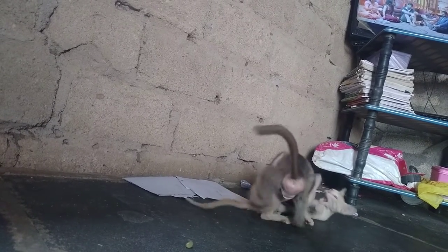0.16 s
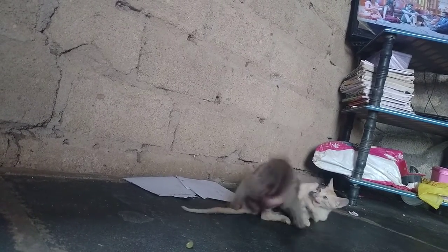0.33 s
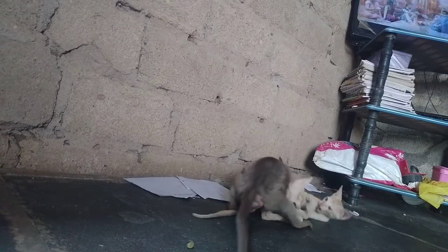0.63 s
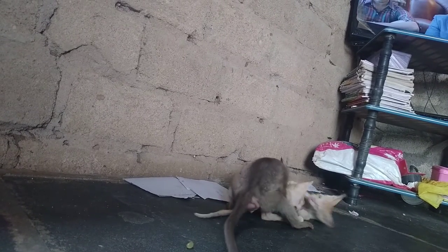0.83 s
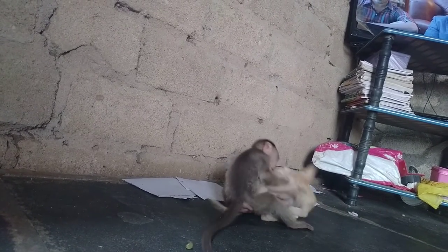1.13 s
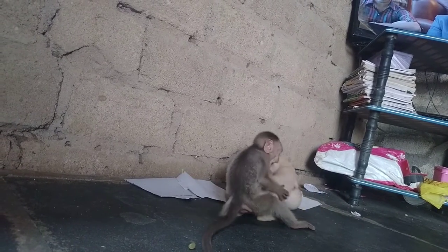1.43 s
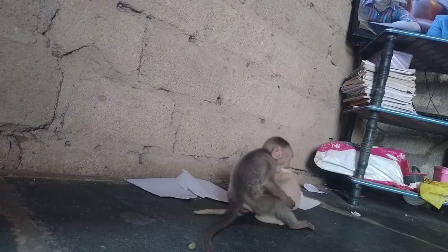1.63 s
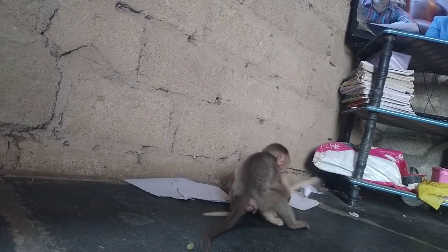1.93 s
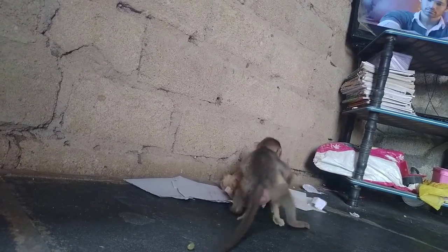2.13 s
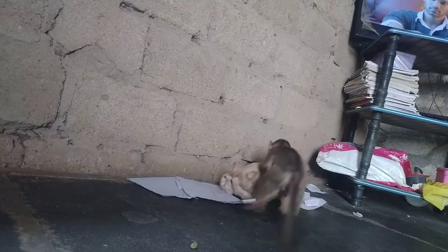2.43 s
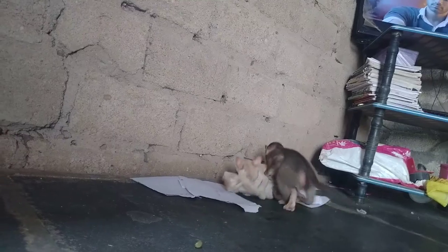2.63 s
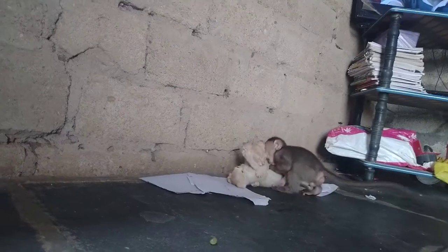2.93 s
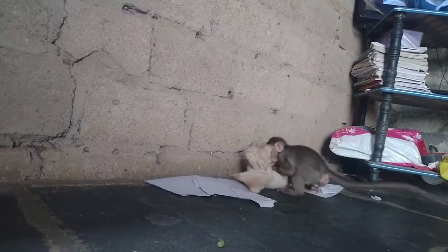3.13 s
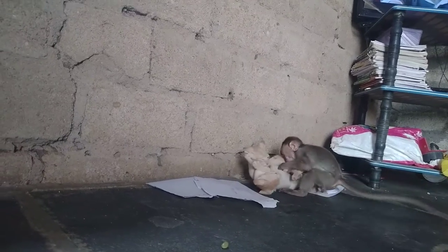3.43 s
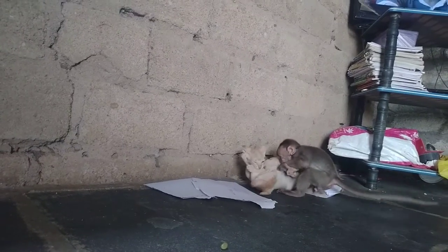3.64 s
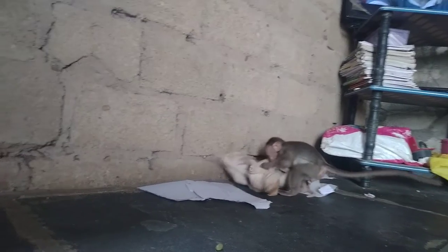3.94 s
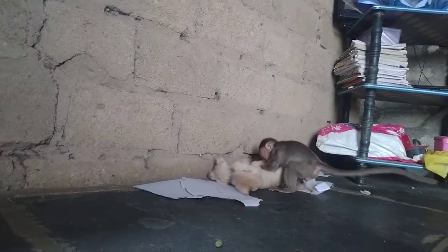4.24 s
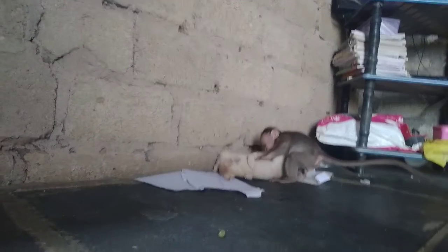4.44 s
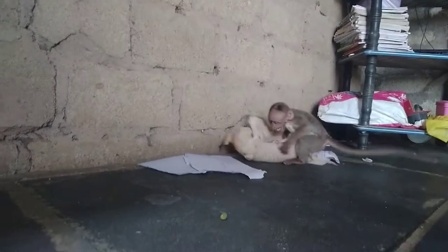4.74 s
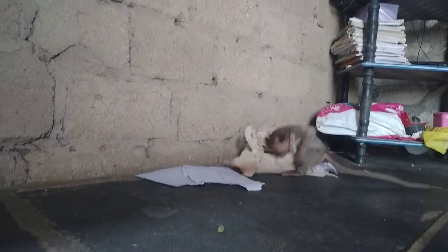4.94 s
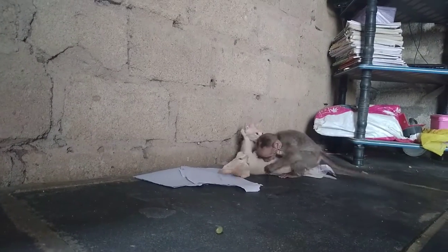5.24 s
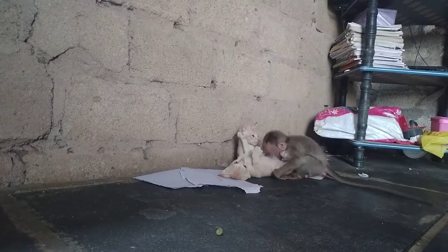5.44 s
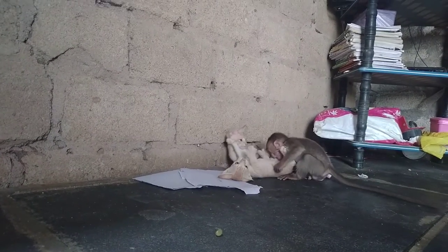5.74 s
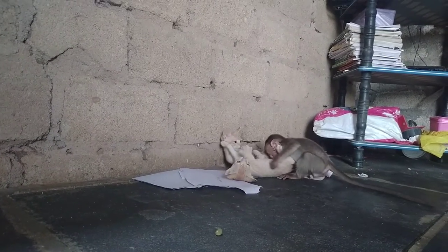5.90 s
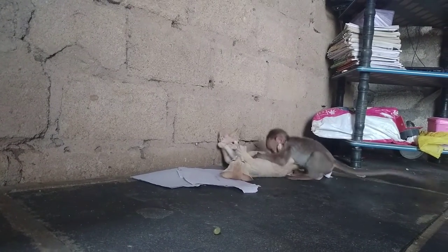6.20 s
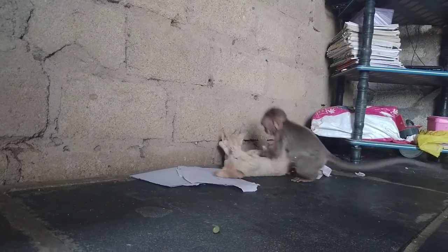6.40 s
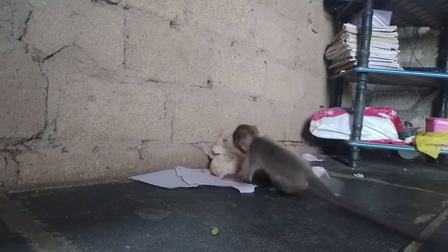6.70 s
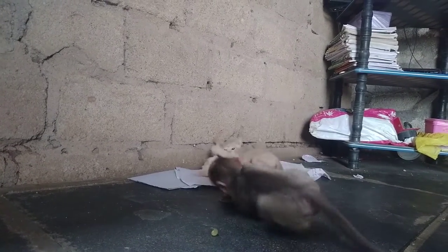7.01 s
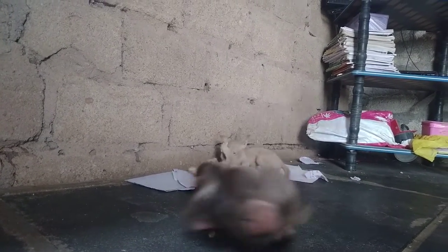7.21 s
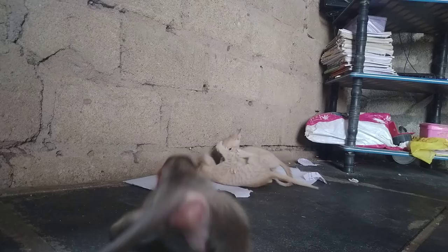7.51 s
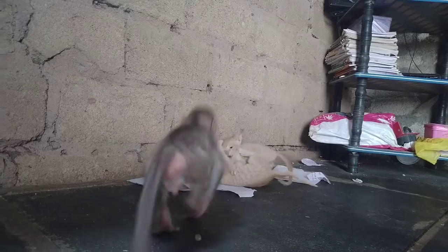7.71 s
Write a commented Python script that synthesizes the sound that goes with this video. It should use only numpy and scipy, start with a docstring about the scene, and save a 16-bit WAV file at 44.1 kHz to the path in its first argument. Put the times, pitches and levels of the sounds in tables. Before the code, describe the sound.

Four clear, wavering kitten mews stand out over quiet outdoor hiss and rumble. The first is short and muted, the middle two drawn-out and piercing, the last shorter and falling. Beneath them, dragged paper crackles and paws bump a hard floor, busiest after the final mew begins. Faint clucks recur throughout, with two distant rough caws and tiny peeps. Short dull room echo, heard by a phone two metres off.

```python
"""A kitten mews four times while a young monkey wrestles it on a sheet of paper on a hard floor, two metres from a phone.
The mews are stacks of partials on a wavering pitch, coloured by throat and mouth. Paws thud as short ringing pushes;
the paper rustles and snaps as filtered noise. Outside a hen clucks and a crow caws, as rough pulses through a throat,
and a chick peeps, as a sliding whistle, over a steady hiss and rumble of shaped noise."""
import sys
import numpy as np
from scipy import signal
from scipy.fft import rfft, irfft, next_fast_len
from scipy.io import wavfile
from scipy.ndimage import uniform_filter1d

SR = 44100
rng = np.random.default_rng(int(sys.argv[2]) if len(sys.argv) > 2 else 0)


def materialize(psi):
    """Save the field psi as 16-bit PCM at rate SR to the path in sys.argv[1].

    A 1-D psi becomes a single channel; in a 2-D psi each row is a channel.
    """
    bounded = np.clip(np.atleast_2d(psi).T, -1, 1)
    quanta = np.round(bounded * 32767).astype(np.int16)
    wavfile.write(sys.argv[1], SR, quanta)


N = 346626  # samples


def undb(db):
    """Gain of a level in dB."""
    return 10 ** (np.asarray(db) / 20)


def unit(x):
    """Scaled to rms 1."""
    return x / np.sqrt(np.mean(x ** 2))


def ring(x, modes):
    """Parallel resonances of (f/Hz, width/Hz, level/dB), signs alternating."""
    out = 0
    for k, (hz, width, db) in enumerate(modes):
        b, a = signal.iirpeak(hz, hz / width, SR)
        out = out + (-1) ** k * undb(db) * signal.lfilter(b, a, x)
    return out


def walk(rate, size=N):
    """Random levels held 1 / rate s and slewed twice; spread near 1."""
    hold = int(SR / rate)
    steps = np.repeat(rng.standard_normal(size // hold + 1), hold)
    return 1.38 * uniform_filter1d(uniform_filter1d(steps, hold), hold)[:size]


def add(out, x, s):
    """Mix x into out from time s."""
    i = int(s * SR)
    out[..., i:i + x.shape[-1]] += x[..., :N - i]


def yard(colour, db, flicker_db):
    """Noise in half-octave bands that swell together and flicker alone; the bass is more alike at both ports."""
    size, (hz, colour_db) = next_fast_len(N), np.transpose(colour)
    f = np.fft.rfftfreq(size, 1 / SR) + 1
    gain = undb(np.interp(np.log(f), np.log(hz), colour_db, left=-80))
    apart = np.clip(f / 1300, .3, 1)
    mid, side = rfft(rng.standard_normal((2, size)))
    ports = gain * (mid + apart * side * np.array([[1], [-1]])) / np.sqrt(1 + apart ** 2)
    out, swell_db = 0, 0.3 * walk(0.24)
    first, last = int(2 * np.log2(hz[0])), int(2 * np.log2(hz[-1])) + 1
    for k in range(first, last + 1):
        share = np.clip(1 - np.abs(2 * np.log2(f) - k), 0, 1)
        band = irfft(ports * share, size)[:, :N]
        out = out + band * undb(swell_db + flicker_db * walk(10))
    return unit(out) * undb(db)


def rumble():
    """The low bed outside: noise with most of its power under 1 kHz."""
    # spectrum of the rumble: f/Hz, level/dB (density, relative)
    rumble_colour = [(40, -30), (55, -8.5), (124, -0.5), (151, -6.5), (179, 2), (340, -5.5), (415, -13.5),
                     (451, -4), (638, -5.5), (859, -6), (903, -10), (1340, -16), (2600, -20.5), (3400, -72)]
    return yard(rumble_colour, db=-54.5, flicker_db=1.83)


def hiss():
    """The high bed outside: noise strongest near 5 to 6 kHz."""
    # spectrum of the hiss: f/Hz, level/dB (density, relative)
    hiss_colour = [(2300, -70), (2700, -20), (3500, -22), (4600, -9.5), (5100, -2), (5800, 1), (7100, -7),
                   (7600, -11), (8800, -12.5), (9400, -18.5), (14300, -27)]
    return yard(hiss_colour, db=-51.5, flicker_db=0.78)


def bird(calls, throat, arch, edge):
    """Uneven pulses and breath noise through the throat; the pitch arches over each call."""
    out, jitter, shimmer, air = np.zeros(N), walk(300), walk(300), rng.standard_normal(N)
    for s, db, hz, length, rough in calls:
        i = int(s * SR) + np.arange(int(length * SR))
        u = np.linspace(-1, 1, len(i))
        arched_hz = hz * (1 - arch * u ** 2)
        cycles = np.cumsum(arched_hz * (1 + 0.12 * rough * jitter[i])) / SR
        pulses = np.diff(np.floor(cycles), prepend=0) * undb(2.8 * rough * shimmer[i])
        fade = np.clip((1 - np.abs(u)) / edge, 0, 1)
        call = (pulses + rough * 0.14 * air[i]) * fade
        # twice through the throat: little is left above its top resonance
        out[i] += undb(db) * unit(ring(ring(call, throat), throat)) / 2.36
    return out


def hen():
    """Short clucks: a few pulses each, ringing in the beak."""
    # clucks: t/s, level/dB (the rms lies 7.5 dB lower), top pitch f/Hz, length/s, roughness 0-1
    clucks = [(.342, -37, 345.7, 0.041, 0.22), (.817, -43, 331, 0.048, 0.64),
              (1.512, -39.5, 309.5, 0.045, 0.27), (2.145, -40, 302.3, 0.047, 0.2),
              (2.59, -48, 331, 0.043, .1), (2.912, -39.5, 298, 0.053, 0.93),
              (3.475, -37.5, 304, 0.049, 0.22), (4.16, -40, 296, 0.05, 0.2), (4.995, -40, 299, 0.045, 0.3),
              (5.5, -43.5, 291, 0.044, 0.06), (6.375, -43, 324, 0.031, 0.21),
              (7.25, -45, 303.6, 0.037, 0.43)]
    # resonances of the beak: f/Hz, width/Hz, level/dB for one pass
    beak = [(295, 88, 1.5), (645, 234, 1), (925, 226, 0), (1720, 910, -8.5)]
    return bird(clucks, beak, arch=0.052, edge=0.33)


def tract_db(hz, opening, mouth_db, throat_db, throat_hz):
    """Colour of a partial: the throat rings in place; a wider mouth rings higher and dulls what lies above."""
    # colour of the partials before the mouth: f/Hz, level/dB
    voice = [(400, 3), (1100, -2.5), (1500, -6), (1900, -4), (2200, -13), (2600, -15.5), (3100, -7),
             (3600, -11), (4300, -5.5), (5000, -10.5), (5600, -3)]
    shut_hz, wide_hz = 900, 4800  # ring of the mouth shut and wide open
    mouth_width_oct, throat_width_oct = 0.32, 0.43
    octaves = np.log2(hz / shut_hz) - opening * np.log2(wide_hz / shut_hz)
    voice_hz, colour_db = np.transpose(voice)
    voice_db = np.interp(np.log(hz), np.log(voice_hz), colour_db)
    # dB per octave above the ring; under an opening of .28 the lips muffle more
    fall_db = 14 + 24 * np.clip(1 - opening / .28, 0, 1)
    throat = np.exp(-(np.log2(hz / throat_hz) / throat_width_oct) ** 2)
    mouth = np.exp(-(octaves / mouth_width_oct) ** 2)
    return voice_db + throat_db * throat + mouth_db * mouth - fall_db * np.maximum(octaves, 0)


def sheen_db(hz, opening):
    """Colour of the high partials: they come out as the mouth opens."""
    # colour of partials 6 to 13: f/Hz, level/dB
    sheen = [(4500, -14.5), (5800, -20.5), (6600, -29.5), (7500, -25.5), (8400, -20.5), (9800, -20),
             (10800, -34), (13200, -30), (14200, -35)]
    sheen_hz, colour_db = np.transpose(sheen)
    shut_db = -35  # loss with the mouth shut
    return np.interp(np.log(hz), np.log(sheen_hz), colour_db, right=-90) + shut_db * (1 - opening)


def kitten():
    """Clean stacks of partials on a wavering pitch; returns the sum and the difference of the two ports."""
    # one table a mew: t/s, pitch f/Hz, level/dB before the tract, mouth opening 0-1,
    # ring of the mouth level/dB, ring of the throat level/dB
    mews = [
        [(.99, 439, -64, 0.1, 0, 0), (1.005, 465, -57.5, 0.22, 2, -2), (1.04, 598, -68, 0.8, 1, -8),
         (1.06, 678, -57.5, 0.6, -3, 7), (1.085, 757, -59, 0.75, -1, 8), (1.1, 724, -57, 0.66, -4, 4),
         (1.13, 753, -59, 0.77, 2, 8), (1.17, 763, -60, 0.87, 7, 12), (1.21, 696, -59, 0.5, -4, 6),
         (1.24, 664, -66.5, .68, 16, -4), (1.28, 615, -71, 0.59, 12, -4), (1.33, 568, -66, 0.53, 4, 3)],
        [(3.12, 408, -59, 0.02, 0, -3), (3.15, 481.5, -63.5, 0.18, 24, 6), (3.21, 719, -56.5, 0.24, 7.5, -2),
         (3.225, 841, -52, 0.76, 3, 5), (3.3, 947, -49, 0.96, 14, -1), (3.34, 1003, -52, 0.81, 15, 1),
         (3.43, 1005, -51, 0.8, 14.5, 1), (3.5, 1061, -51, 0.88, 15.5, 4), (3.56, 1000, -53, 0.81, 24, 5),
         (3.66, 928, -51.5, 0.68, 0.5, 13.5), (3.72, 1008, -50.5, 0.8, 7, 14), (3.732, 1044, -53, 0.78, 25, 2),
         (3.745, 832, -54.5, 1, 6.5, 9), (3.785, 904, -48.5, 0.66, 15, 3.5), (3.84, 852, -50, 0.72, 2, 5),
         (3.9, 827, -52.5, 0.4, -7, 1), (3.955, 660, -61.5, 0.23, 9.5, 1), (3.99, 520, -74, 0.05, -2, -5)],
        [(4.47, 660, -55, 0.15, 3, 0), (4.512, 799, -51, 0.23, -6, -7), (4.525, 810, -58.5, 0.85, 17, 3),
         (4.57, 920, -53.5, 0.9, 18.5, -4), (4.63, 1012, -47.5, 0.97, 15.5, -17),
         (4.69, 1020, -46.5, 0.94, 15, -7), (4.77, 1080, -60, 0.91, 31, 27), (4.82, 1126, -53, 0.89, 32, 13),
         (4.87, 1130, -50, 0.89, 26.5, 0), (4.92, 1143, -49, 0.96, 20, 3), (4.99, 1114, -45.5, 0.96, 17.5, 0),
         (5.04, 1079, -45.5, 0.93, 12, -5), (5.1, 1097, -46.5, 1, 1, -9), (5.17, 1078, -48.5, 0.94, 21, -16),
         (5.24, 1096, -46.5, 1, 4.5, 7), (5.31, 1113, -46, 0.92, 24.5, -2), (5.39, 1096, -45.5, 0.89, 18.5, 9),
         (5.44, 1068, -50, 0.87, 26.5, -8), (5.52, 1045, -47, 0.84, 15.5, -8), (5.6, 988, -48, 0.8, 11.5, -1.5),
         (5.65, 913, -53.5, 0.76, 9.5, 3.5), (5.68, 695, -47, 0.27, -1, 2), (5.72, 635, -81, 0.02, -5, -7)],
        [(6.58, 337, -62, 0, -2, 0), (6.62, 436, -57, 0.17, -3, 10), (6.68, 636, -58.5, 0.2, 6, 8),
         (6.725, 786, -52, 0.02, 2, 0), (6.74, 841, -64, 0.94, 13, 13), (6.765, 878, -61, 0.91, 21, 6),
         (6.79, 946, -49, 0.93, 14.5, 1), (6.82, 977, -53.5, 0.89, 21.5, 5), (6.855, 991, -53, 0.96, 16, 9),
         (6.88, 958, -50, 0.68, 7.5, 3), (6.91, 911, -55, 0.62, 1, 9), (6.94, 872, -59, 0.57, 9, 11.5),
         (6.985, 846, -58.5, 0.62, 8, 6), (7.0, 829, -59, 0.53, 0, -6), (7.025, 809, -65, 0.4, -2, -4),
         (7.045, 775, -55.5, 0.16, -3, -5), (7.1, 709, -56, 0.17, -4, -4), (7.15, 695, -61.5, 0, 0, 0),
         (7.2, 659, -66, 0.06, 0, 0)],
    ]
    # ring of the throat, one a mew: f/Hz
    throats_hz = [1400, 1830, 1880, 1800]
    # cracks of the voice: start t/s, length/s, pitch scatter as a share
    cracks = [(1.0, .05, .035), (1.1, .2, .02), (3.735, .03, .045), (3.77, .14, .012), (5.66, .06, .06),
              (6.74, .06, .012), (6.88, .25, .012), (4.55, .2, .006), (4.78, .3, .007)]
    # level of the high partials through the mews: t/s, level/dB
    sheen_level = [(3.3, 7), (3.4, 5), (3.5, 15), (3.62, 3), (3.8, 10), (4.58, 7.5), (4.68, 1.5),
                   (4.82, 13.5), (5.0, 6), (5.35, 9), (5.55, 7.5), (6.8, 5)]
    waver, flutter_depth = .0045, .4  # shares of pitch and of amplitude
    step_db, sway_db = 3, 2.5  # high partials: loss from one to the next, sway of each
    side_db = 1.5

    t = np.arange(N) / SR
    scatter = sum(share * np.exp(-np.abs(t - s - length / 2) / length * 2) for s, length, share in cracks)
    out, drift = np.zeros((2, N)), 1 + waver * walk(45) + scatter * walk(400)
    echo = [walk(40) + 1j * walk(40) + .3 * walk(150) for _ in range(5)]
    turn = [walk(5) for _ in range(5)]
    rasp = 0.7 * (walk(250) + 1j * walk(250))  # breath roughens the high partials
    for mew, throat_hz in zip(mews, throats_hz):
        s, *controls = np.transpose(mew)
        i = np.arange(int(s[0] * SR), int(s[-1] * SR))
        hz, level_db, *tract = (np.interp(i / SR, s, c) for c in controls)
        hz = uniform_filter1d(hz, size=300)
        phase = 2 * np.pi * np.cumsum(hz * drift[i]) / SR
        part_db = [level_db + tract_db(k * hz, *tract, throat_hz) for k in range(1, 6)]
        high_db = level_db + np.interp(i / SR, *np.transpose(sheen_level))
        for k in range(6, 14):
            sway = sway_db * walk(13.94, size=len(i))
            part_db.append(high_db + sheen_db(k * hz, tract[0]) - step_db * (k - 8) + sway)
        edge = signal.windows.tukey(len(i), 0.048 / (s[-1] - s[0]))
        for k, db in enumerate(part_db):
            # floor and wall echoes beat with the direct sound as the head moves, more so for short waves
            depth = flutter_depth * min((k + 2) / 5, 1.5)
            flutter = 1 + depth * (echo[k % 5][i] + (k > 4) * rasp[i])
            partial = np.sqrt(2) * edge * undb(db) * flutter * np.exp(1j * (k + 1) * phase)
            out[0, i] += partial.real
            # and the phase between the ports wanders; long waves differ less
            side = undb(side_db) * min((k + 1.4) / 4, 1)
            out[1, i] += side * (partial * np.exp(4j * turn[k % 5][i])).real
    return out


def paper(crackle_db=2.0):
    """Dense crackle as the sheet is dragged, and single snaps of its creases."""
    # drags of the sheet: t/s of the peak, level/dB (rms at the peak), fade time/s
    drags = [(1.44, -52, 0.077), (1.6, -54, 0.046), (1.75, -55, 0.084), (1.97, -54.5, 0.074),
             (2.17, -51.5, 0.045), (2.45, -54, 0.14), (2.78, -56.5, 0.063), (3.3, -56, 0.037),
             (4.82, -49.5, 0.044), (4.99, -46.5, 0.067), (5.45, -54, 0.23), (6.61, -58, 0.036),
             (6.741, -45, 0.029), (6.81, -45.5, 0.017), (6.94, -47, 0.067), (7.16, -52.5, 0.032),
             (7.42, -54, 0.082), (7.66, -60, 0.49)]
    # snaps: t/s, peak level/dB before panning, left minus right level/dB
    snaps = [(1.933, -37, 7), (1.9547, -41, -8), (2.158, -43, 2), (2.371, -44.5, 6), (3.303, -43, 3),
             (6.7432, -22, 3), (7.45, -40, 7), (7.4872, -34.5, 5)]
    # resonances of the sheet: f/Hz, width/Hz, level/dB
    sheet = [(2600, 7800, -6.5), (4310, 380, 2.5), (7700, 1550, -4), (12000, 7000, -8.5)]
    rise_share = 0.62  # of the fade time
    t, drag = np.arange(N) / SR, 0
    for s, db, fade in drags:
        drag = drag + undb(db) * np.exp(-np.abs(t - s) / np.where(t < s, rise_share * fade, fade))
    # a new random level every 40 samples
    crackle = np.repeat(np.minimum(rng.exponential(size=N // 40 + 1), 4), 40)[:N]
    grains = rng.standard_normal((2, N)) * undb(crackle_db * crackle)
    out = unit(ring(grains, sheet)) * drag
    t = np.arange(int(0.065 * SR)) / SR
    decay = np.exp(-t / 0.0041) + 0.17 * np.exp(-t / 0.032)
    for s, db, pan_db in snaps:
        snap = ring(rng.standard_normal(len(t)) * decay, sheet)
        ports_db = db + np.array([[pan_db], [-pan_db]]) / 2
        add(out, undb(ports_db) * snap / np.abs(snap).max(), s)
    return out


def chick():
    """A short faint whistle that slides down and throbs twice."""
    # peeps: t/s, peak level/dB
    peeps = [(1.742, -58), (2.395, -60.5)]
    from_hz, to_hz, length_s = 3520, 3000, .058
    out, u = np.zeros(N), np.linspace(0, 1, int(length_s * SR))
    phase = 2 * np.pi * np.cumsum(from_hz + (to_hz - from_hz) * u ** 2) / SR
    throb = np.abs(np.sin(2 * np.pi * u))
    for s, db in peeps:
        add(out, undb(db) * throb * np.sin(phase), s)
    return out


def paws():
    """A short push on the floor rings briefly; the pad dulls the contact."""
    # thuds: t/s, peak level/dB before the room, ring f/Hz, t60/s of the push
    thud_table = [(2.3355, -44.5, 584, 0.03), (2.8079, -31, 292, 0.014), (4.3177, -41, 363, 0.04),
                  (6.7438, -26.5, 910, 0.012), (6.8078, -30.5, 255, 0.02), (6.9375, -39, 869, 0.03),
                  (7.0815, -37.5, 685, 0.02), (7.3935, -32.5, 540, 0.015), (7.4743, -32, 603, 0.04),
                  (7.4874, -26.5, 402, 0.05), (7.4933, -32.5, 260, .05), (7.5025, -33, 160, .12)]
    out, t = np.zeros(N), np.arange(int(.15 * SR)) / SR
    pad = np.hanning(24)
    for s, db, hz, t60 in thud_table:
        push = 0.35 * rng.standard_normal(len(t)) * np.exp(-np.log(1000) * t / t60)
        push[0] += 12  # the first contact
        floor = [(hz, 0.22 * hz, 0), (1.3 * hz, 2.3 * hz, -13), (0.61 * hz, 0.4 * hz, -6)]
        hit = ring(np.convolve(push, pad), floor)
        add(out, undb(db) * hit / np.abs(hit).max(), s)
    return out


def crow():
    """Longer hoarse caws: rough pulses through a wide throat."""
    # caws: t/s, level/dB (the rms lies 7.5 dB lower), top pitch f/Hz, length/s, roughness 0-1
    caws = [(2.385, -45.5, 354, 0.26, .38), (5.27, -43, 360, 0.289, 0.42)]
    # resonances of the throat: f/Hz, width/Hz, level/dB for one pass
    crow_throat = [(980, 410, -3), (1430, 300, 2.5), (1800, 600, 1), (2200, 340, -4.5)]
    return bird(caws, crow_throat, arch=0.07, edge=0.63)


def room(x):
    """Direct sound, a little later at the left port, and a dull tail of wall echoes that differs between ports."""
    t60_s, tail_db, dull_hz, lag = 0.16, -3.5, 5340, 2  # lag in samples
    t = np.arange(int(.5 * SR)) / SR
    tail = rng.standard_normal((2, len(t))) * np.exp(-np.log(1000) * t / t60_s) * (t > .003)
    tail = signal.lfilter(*signal.butter(1, dull_hz, fs=SR), tail)
    tail *= undb(tail_db) / np.sqrt(np.sum(tail ** 2, axis=1, keepdims=True))
    tail[0, lag] += 1
    tail[1, 0] += 1
    return signal.fftconvolve(x[None], tail, axes=1)[:, :N]


def scene():
    """Animals and paws in the room, over paper and yard."""
    paw_room, mew_room = undb(-7), undb(-3)  # gains into the room
    outside = rumble() + hiss()
    both, apart = kitten()
    mews = np.array([both + apart, both - apart])
    thuds = paws()
    birds = hen() + chick() + crow()
    walls = room(birds + paw_room * thuds + mew_room * both)
    return mews + (1 - paw_room) * thuds + walls + paper() + outside


def record(dry):
    """The right port loses most of its bass; the phone cuts the top."""
    bass_cut_hz, bass_kept_db, top_hz = 478, -11.5, 14250
    high_pass = signal.butter(2, bass_cut_hz, "high", fs=SR, output="sos")
    thin = signal.sosfilt(high_pass, dry[1])
    wet = np.array([dry[0], thin + undb(bass_kept_db) * (dry[1] - thin)])
    return signal.sosfilt(signal.ellip(10, .2, 80, top_hz, fs=SR, output="sos"), wet)


dry = scene()
out = record(dry)
materialize(out)
```